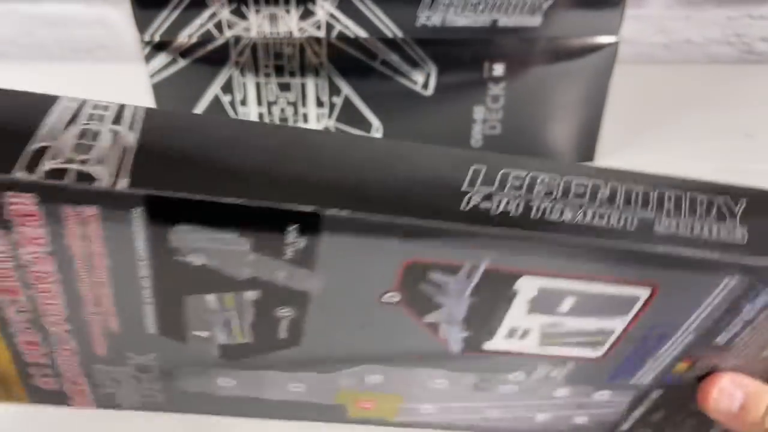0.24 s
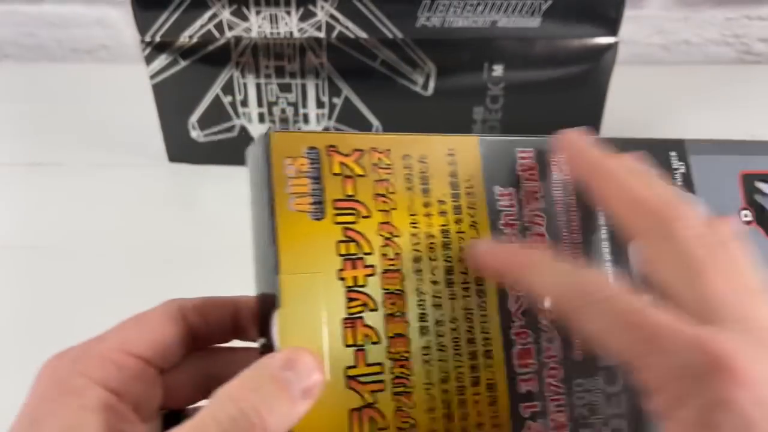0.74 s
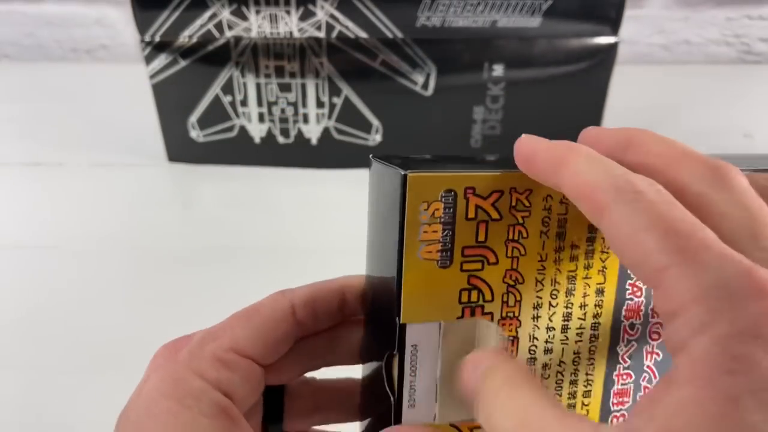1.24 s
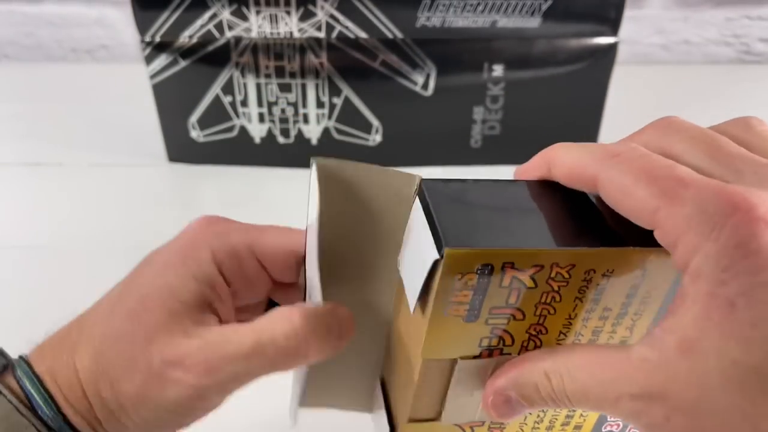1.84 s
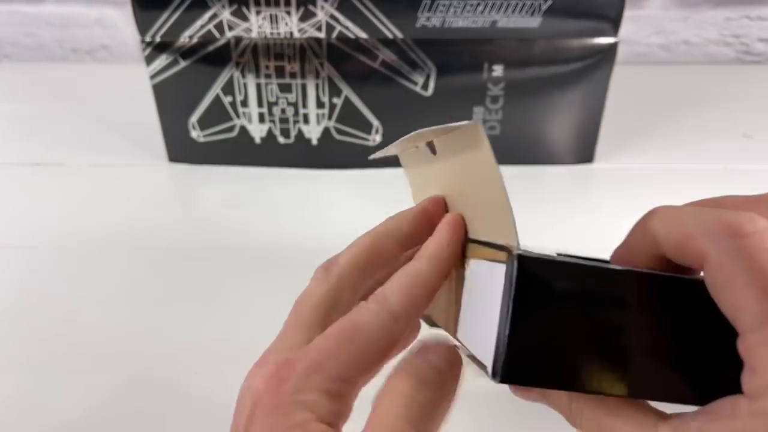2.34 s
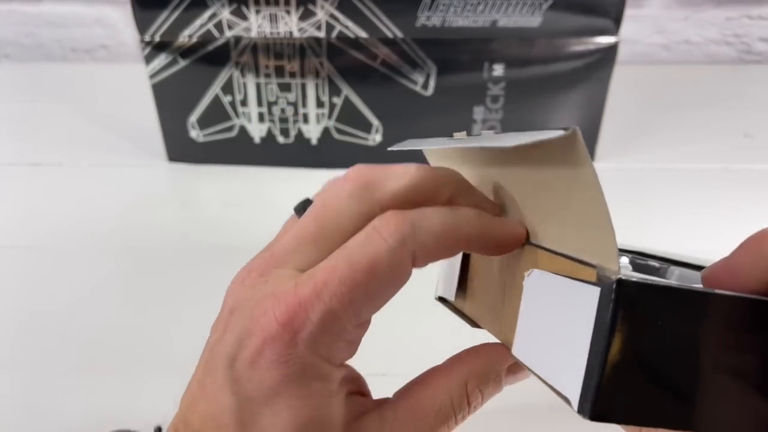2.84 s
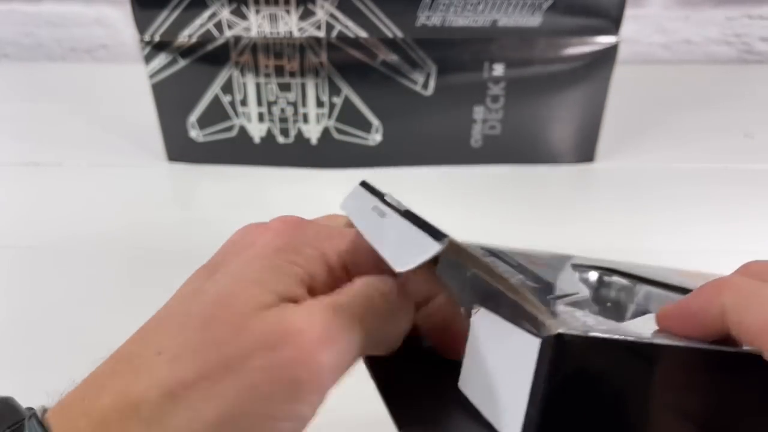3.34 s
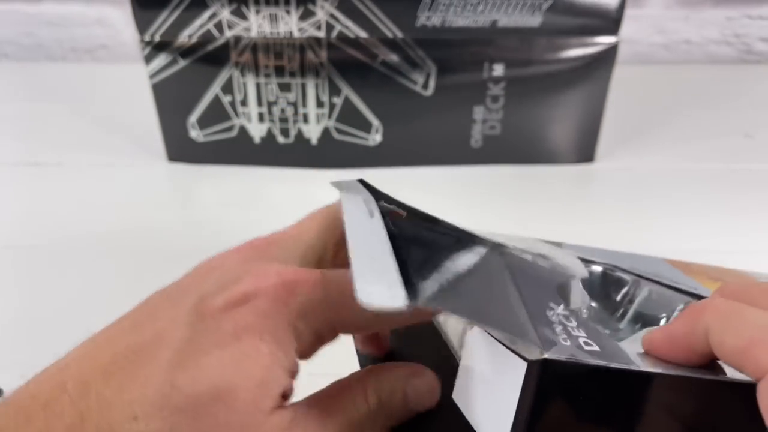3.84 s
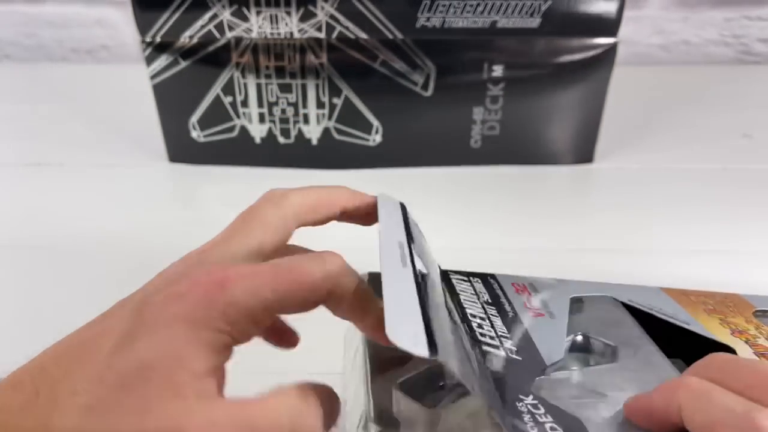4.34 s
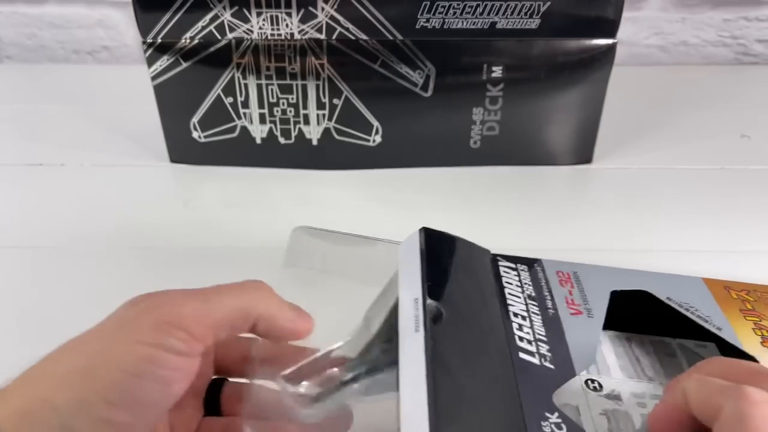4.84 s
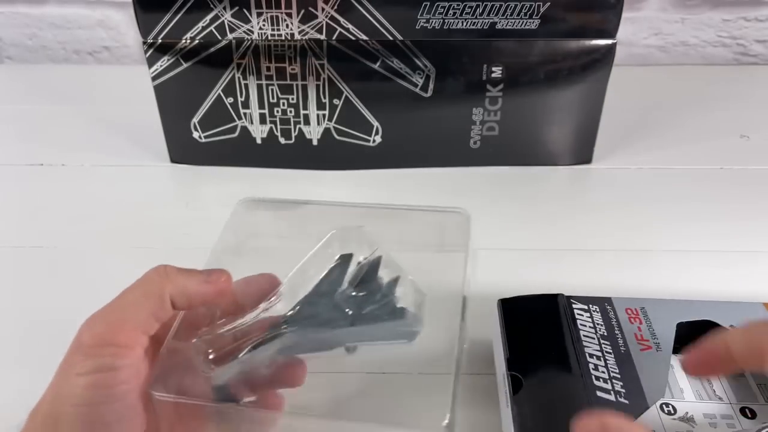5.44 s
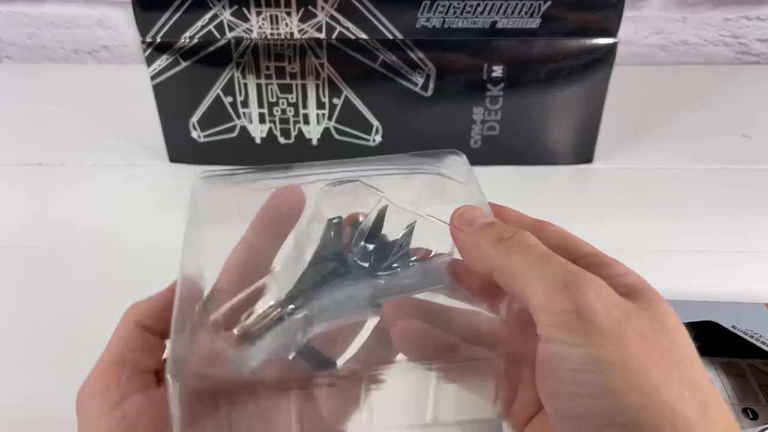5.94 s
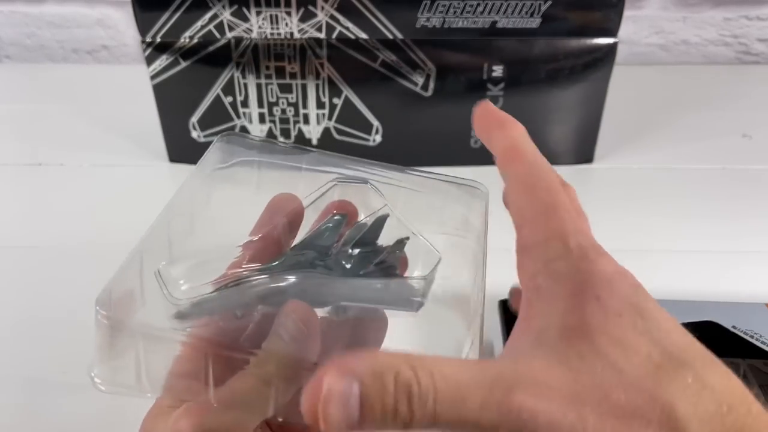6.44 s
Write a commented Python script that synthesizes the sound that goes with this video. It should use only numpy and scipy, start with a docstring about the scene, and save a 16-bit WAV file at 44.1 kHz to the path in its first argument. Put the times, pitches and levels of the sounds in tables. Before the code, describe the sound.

Close up in a small room, fingertips rub and bump a light card box, then pick at its flap in sharp little clicks. After more thumps and card scrapes comes one loud, dry snap with a brief papery rattle. A plastic blister tray drags out of the sleeve in uneven jerks, ticking and squeaking, and later flexes with a muted pop. Quiet room noise and hum lie beneath.

```python
"""A cardboard box is handled on a table in a small room: its card ticks, knocks and rubs as hands pick a flap open.
Blows ring card panels, thump the hollow box and crack in the treble; rubs and scrapes are random slips.
The inner flap snaps loudly and rattles; a plastic blister tray scrapes out along the sleeve, crackles,
squeaks, and pops once as it is turned over: bursts of bending waves and slips through its resonances.
Filtered noise and a few wavering sines make the faint room noise and hum underneath."""
import sys
import numpy as np
from scipy import signal
from scipy.fft import rfft, irfft, next_fast_len
from scipy.io import wavfile
from scipy.ndimage import uniform_filter1d

SR = 44100
rng = np.random.default_rng(int(sys.argv[2]) if len(sys.argv) > 2 else 0)


def transcribe(u):
    """Save the signal u as a 16-bit wav file named by the first command-line argument.

    u: samples, shape (n,) or (channels, n), limited to [-1, 1]; the rate is SR.
    q: integer samples, one column per channel.
    """
    v = np.clip(np.atleast_2d(u).T, -1, 1)
    q = np.round(v * 32767).astype(np.int16)
    wavfile.write(sys.argv[1], SR, q)


N = 295205
TAPS = 2048  # response length, samples


def amp(db):
    """Decibels to gain."""
    return 10 ** (np.asarray(db) / 20)


def evened(x):
    """Scales to rms 1."""
    return x / np.sqrt(np.mean(x ** 2) + 1e-20)


def unit(x):
    """Scales to energy 1."""
    return x / (np.linalg.norm(x) + 1e-12)


def read(points, hz, axis=1):
    """One table column, interpolated linearly over log frequency."""
    points = np.array(points)
    return np.interp(np.log(hz + 1), np.log(points[:, 0] + 1), points[:, axis])


def add(mix, start_s, sound):
    """Mixes a sound in at start_s, cropped to the mix."""
    at = round(start_s * SR)
    sound = sound[max(-at, 0):]
    part = mix[max(at, 0):][:len(sound)]
    part += sound[:len(part)]


def push(t, start_s, hold_s, attack_s, fade_db_per_s):
    """Envelope of a push of the hand: attack, hold, release."""
    attack = np.clip((t - start_s) / attack_s, 0, 1)
    return attack * amp(-fade_db_per_s * np.maximum(t - start_s - attack_s - hold_s, 0))


def drone(hz, width_hz, size=8192):
    """A low resonance kept going by random pushes, rms 1."""
    f = np.fft.rfftfreq(size, N / size / SR)
    resonance = 1 / (1 + (2 * (f - hz) / width_hz) ** 2)
    slow = irfft(rfft(rng.standard_normal(size)) * resonance, 4 * size)
    return np.interp(np.arange(N), np.linspace(0, N, len(slow)), evened(slow))


RING_WIDTH = 0.11  # half width of the main mode, share of its pitch


def ring(spectrum, hz=1000, focus_db=0, ripple_db=0, ring_db=0, octaves=.4, size=7):
    """Causal (minimum-phase) response of a surface: one main mode at hz among randomly excited lesser modes.
    The spectrum falls by about focus_db an octave away from hz; the main mode stands out by ring_db."""
    f = np.fft.rfftfreq(TAPS, 1 / SR)
    noise = rng.standard_normal(len(f))
    modes = evened(uniform_filter1d(uniform_filter1d(noise, size), size))
    main = 1 / (1 + ((f - hz) / (RING_WIDTH * hz)) ** 2)
    db = read(spectrum, f) - focus_db * np.hypot(np.log2((f + 50) / hz), octaves)
    db += ring_db * main + ripple_db * np.tanh(modes) * (1 - main)
    # folding the cepstrum makes the response causal
    cepstrum = irfft(np.log(amp(np.maximum(db, -100))))
    return unit(irfft(np.exp(2 * rfft(cepstrum[:TAPS // 2], TAPS))))


# modes of the hollow box, before detuning: (frequency [Hz], relative level [dB], t60 [s])
BOX_MODES = [(160, -9, 0.046), (239, -2, 0.047), (374, 0, 0.042), (479, -0.5, 0.043)]
THUD_HZ, THUD_OCTAVES = 346, 0.46  # usual pitch of a pushed wall, spread either way
THUD_CYCLES, BOX_RING_DB = 0.59, -5.5  # cycles to envelope peak; ring re wall


def hollow(hz=None, spread=0.098):
    """A box wall gives and springs back in a couple of cycles; low modes, detuned by the grip, ring faintly on."""
    t = np.arange(TAPS) / SR
    spot_hz = THUD_HZ * 2 ** (THUD_OCTAVES * rng.uniform(-0.98, 1))
    turns = (hz or spot_hz) * t
    wall = turns * np.exp(-turns / THUD_CYCLES) * np.sin(2 * np.pi * turns)
    mode_hz, db, t60_s = np.transpose(BOX_MODES)[:, :, None]
    mode_hz = mode_hz * (1 + spread * rng.uniform(-0.93, 1, mode_hz.shape))
    sign = rng.choice([-1, 1], mode_hz.shape)
    modes = np.sum(amp(db - 60 * t / t60_s) * np.sin(2 * np.pi * mode_hz * t) * sign, axis=0)
    return unit(unit(wall) + amp(BOX_RING_DB) * unit(modes))


def buckle(buckle_s, size=12):
    """A sheet flips over: a burst of bending waves, evened across wide bands and cut at 12 ms."""
    u = np.arange(TAPS // 2) / SR / max(buckle_s, 1e-4)
    z = rfft(rng.standard_normal(len(u)) * np.sqrt(u) * np.exp(-(u / 2.54) ** 2))
    z /= np.sqrt(uniform_filter1d(abs(z) ** 2, size) + 1e-12)
    return unit(irfft(z)[:TAPS // 4])


def friction(count, slips_per_s, grain_db, smooth):
    """Tiny slips of uneven size over a smooth hiss, rms 1."""
    slips = (rng.random(count) < slips_per_s / SR) * rng.choice([-1, 1], count)
    slips = slips * amp(grain_db * np.minimum(rng.exponential(1, count), 3))
    return evened(evened(slips) + smooth * rng.standard_normal(count))


# treble radiated by sharp edges: (frequency [Hz], relative density [dB per Hz])
CRACK = [(2500, -25.5), (4400, -5.5), (5600, 1), (7500, -3), (10000, -6.5), (15500, -13.5)]
MEDIUM_DB, MEDIUM_HZ = -40, 2000  # reference blow
CRACK_DB_PER_DB, CRACK_DB_PER_OCTAVE = .15, 10  # harder blows and higher panels crack more
BASE_BUCKLE_S = 0.000999  # panel flip time scale before stretch
PANEL_RIPPLE_DB = 6  # unevenness of the lesser modes


def clicks(rows, material, gain_db, focus_db, crack_db, room_db, stretch, diffuse_share=.45):
    """Each blow rings a panel, thumps the hollow box and cracks in the treble; returns direct sound and room feed.
    The room gathers all directions, so only a share of the panel's peaks and notches is left in its feed."""
    near, far = np.zeros((2, N))
    edge = np.roll(ring(CRACK), 20)
    for start_s, db, hz, thud_db, ring_db, *thud_hz in rows:
        crack = crack_db + CRACK_DB_PER_DB * (db - MEDIUM_DB)
        crack += CRACK_DB_PER_OCTAVE * np.log2(hz / MEDIUM_HZ)
        sheets = []
        for share in (1, diffuse_share):
            panel = ring(material, hz, focus_db, share * PANEL_RIPPLE_DB, share * ring_db)
            sheets.append(amp(db + gain_db) * (panel + amp(crack) * edge))
        direct, diffuse = sheets
        thump = amp(db + gain_db + thud_db) * hollow(*thud_hz)
        add(near, start_s, np.convolve(buckle(BASE_BUCKLE_S * stretch), direct))
        add(near, start_s, thump)
        add(far, start_s + BASE_BUCKLE_S, diffuse + thump)
    return np.array([near, amp(room_db) * far])


THUD_DB_PER_DB = -.5


def thudding(rows, thud_db):
    """Adds each row's hollow thud: thud_db at medium strength, relatively less for harder blows."""
    return [(start_s, db, hz, thud_db + THUD_DB_PER_DB * (db - MEDIUM_DB), ring_db)
            for start_s, db, hz, ring_db in rows]


def catches(spans, above_db, spread_db, hz, octaves, count, ring_db=6):
    """A sliding surface catches at a random moment in each of count slots: rows (time, level, pitch, ring)."""
    rows = []
    for start_s, end_s, db in spans:
        for k, (when, size, spot) in enumerate(rng.random((count, 3))):
            catch_s = start_s + (end_s - start_s) * (k + when) / count
            catch_db = db + above_db + spread_db * (2 * size - 1)
            rows.append((catch_s, catch_db, hz * 2 ** (octaves * (2 * spot - 1)), ring_db))
    return rows


PEAK_SHARE = .45  # position of peak force in a rub or scrape


def drags(rows, material, gain_db, focus_db, room_db, swell, slips_per_s, grain_db):
    """Skin and card edges drag over the box: a swell of slips through panels, hollow box and edges."""
    out, edge = np.zeros(N), ring(CRACK)
    t = np.arange(SR // 3) / SR
    for start_s, length_s, db, hz, thud_db, hiss_db, ring_db in rows:
        force = np.interp(t / length_s, [0, PEAK_SHARE, 1], [0, 1, 0]) ** swell
        panel = ring(material, hz, focus_db, ripple_db=5, ring_db=ring_db)
        body = panel + amp(thud_db) * hollow() + amp(hiss_db) * edge
        drag = friction(len(t), slips_per_s, grain_db, smooth=0.52)
        add(out, start_s, amp(db + gain_db) * signal.fftconvolve(force * drag, body))
    return np.array([out, amp(room_db) * out])


def pop(row, spectrum, gain_db):
    """A whole bent panel springs free at once; returns direct sound and room feed."""
    start_s, db, thud_db, buckle_s, room_db = row
    near, far = np.zeros((2, N))
    sheet = ring(spectrum, ripple_db=2) + amp(thud_db) * hollow()
    add(near, start_s, np.convolve(buckle(buckle_s), sheet))
    add(far, start_s, sheet)
    return amp(db + gain_db) * np.array([near, amp(room_db) * far])


# room noise: (frequency [Hz], relative density [dB per Hz])
AIR = [(15, -12), (35, -4), (60, -0.5), (80, -8), (150, -11.5), (250, -8.5), (350, -14), (700, -21),
       (1400, -27), (2800, -36), (5600, -45), (10000, -50.5), (15800, -51.5)]
AIR_DB = -54  # rms
# hum: (frequency [Hz], peak level of the steady sine [dB])
HUM = [(59.3, -57.5), (118.5, -62.5), (237, -70), (285, -68)]


def background(waver=0.71):
    """Steady shaped room noise, and hum: sines plus narrow-band wavering."""
    t, size = np.arange(N) / SR, next_fast_len(N, True)
    spectrum = amp(read(AIR, np.fft.rfftfreq(size, 1 / SR)))
    air = irfft(rfft(rng.standard_normal(size)) * spectrum, size)[:N]
    hum = np.zeros(N)
    for hz, db in HUM:
        steady = np.sin(2 * np.pi * (hz * t + rng.random()))
        hum += amp(db) * (steady + waver * drone(hz, width_hz=8))
    return amp(AIR_DB) * evened(air) + hum


# hands shift their grip: (start [s], end [s], level [dB], hollow thud re panel [dB])
RUBS = [(-.05, .12, -63, -9), (.22, .5, -69, -5), (.48, 0.618, -57.5, -9), (.54, 0.701, -60.5, 5.5),
        (0.661, .82, -60.5, 6.5), (.8, 1.102, -65.5, 4), (1.37, 1.46, -62, -16), (1.46, 1.659, -55.5, 7),
        (1.93, 1.991, -57.5, 5), (2.851, 3.032, -57, 3), (3.015, 3.118, -52, 10), (3.13, 3.33, -55.5, -3),
        (3.3, 3.48, -54.5, -1.5), (3.44, 3.72, -57, -4), (3.7, 3.96, -56.5, -8), (3.93, 4.05, -55.5, -4),
        (4.085, 4.136, -52, -2)]
# card panel radiation: (frequency [Hz], relative density [dB per Hz])
CARD = [(200, -24.5), (550, 0.5), (800, 4), (1200, -1.5), (1900, -1), (2600, -3.5), (3300, -3.5),
        (4200, -8.5), (5300, -7.5), (8000, -28), (15000, -47)]
SKIN_HZ = 1450  # panel pitch under a fingertip
SKIN_HISS_DB, HISS_DB_PER_THUD_DB = -10.5, -0.52  # a flat, thudding grip hisses less


def rubs():
    """Fingertips drag slowly and softly on card, with faint ticks where the skin catches."""
    rows = []
    for start_s, end_s, db, thud_db in RUBS:
        hiss_db = SKIN_HISS_DB + HISS_DB_PER_THUD_DB * thud_db
        rows.append((start_s, end_s - start_s, db, SKIN_HZ, thud_db, hiss_db, 0))
    spans = [row[:3] for row in RUBS]
    # the second field of a span is its end: here the end [s] from the table
    ticks = catches(spans, above_db=-0.5, spread_db=3, hz=1700, octaves=0.65, count=2)
    skin = drags(rows, CARD, gain_db=0, focus_db=4.5, room_db=-4, swell=1.17, slips_per_s=800, grain_db=3.5)
    return skin + clicks(thudding(ticks, thud_db=-11.5), CARD, gain_db=21, focus_db=5, crack_db=-12,
                         room_db=-5, stretch=1.2)


# box bumped, side flaps pushed open, box drops back as the tray leaves:
# (time [s], level before gain [dB], panel pitch [Hz], hollow thud re panel [dB], thud pitch [Hz])
BOX_KNOCKS = [(.067, -41.5, 1130, 1, 259), (.239, -50, 1330, 11.5, 189), (.5545, -41.5, 1400, 14.5, 201),
              (.573, -45, 900, 6, 251), (.591, -47.5, 1010, 15, 95), (.675, -45.5, 950, 7.5, 286),
              (.769, -48.5, 1400, 11, 288), (.942, -49.5, 1370, 0, 250), (1.463, -46, 1350, 5.5, 231),
              (1.52, -40, 1130, 4.5, 294), (2.7157, -37.5, 1500, 3.5, 301), (2.8495, -43, 1670, 7.5, 293),
              (2.893, -53, 1360, 14, 280), (2.9136, -46, 1600, 7, 288), (2.929, -48, 1180, 5, 300),
              (3.7385, -40.5, 1210, 10.5, 250), (3.746, -35, 900, 0, 262), (3.8426, -37.5, 1310, 4.5, 352),
              (3.8489, -34.5, 960, -2.5, 280), (4.171, -33.5, 1020, -2, 454), (5.2547, -38, 1000, 4.5, 400),
              (5.29, -39, 950, -2, 600), (5.298, -41, 600, 2, 436)]
KNOCK_RING_DB = 4.5
REBOUND_S, REBOUND_DB = (.008, .024), -12.5  # delay (min, max); level re knock


def knocks():
    """Each knock on the box rings and thumps it; it settles back once, softly."""
    rows = [(start_s, db, hz, thud_db, KNOCK_RING_DB, thud_hz)
            for start_s, db, hz, thud_db, thud_hz in BOX_KNOCKS]
    rebounds = [(start_s + rng.uniform(*REBOUND_S), db + REBOUND_DB, *rest) for start_s, db, *rest in rows]
    return clicks(rows + rebounds, CARD, gain_db=23, focus_db=7, crack_db=-11.5, room_db=-5, stretch=1.2)


# card edges and tray rim scrape:
# (time of peak force [s], length [s], level before gain [dB], pitch [Hz], main-mode ring [dB])
SCRAPES = [(.459, 0.048, -46, 1670, 3), (.53, .05, -53, 1700, 6), (.93, 0.048, -55.5, 2200, 3),
           (1.166, .12, -47, 2600, -2), (1.168, .03, -35.5, 1950, 8), (1.183, .022, -33, 2900, 9),
           (1.724, .036, -35, 3500, 9), (1.785, .07, -45, 3100, 5), (2.2, .09, -47.5, 2800, 4),
           (2.314, 0.058, -51.5, 3280, 5), (3.032, 0.057, -33.5, 2350, 8), (3.081, 0.079, -42.5, 2400, 4),
           (3.259, 0.041, -50.5, 2400, 4), (4.171, 0.054, -44, 1810, 3), (4.234, 0.084, -47, 1810, 2),
           (4.375, .16, -45, 1630, 7), (4.488, 0.068, -52.5, 2800, 4), (4.601, 0.051, -47, 2130, 5),
           (5.288, .05, -43.5, 1000, 5), (5.426, .035, -43, 2580, 1), (5.65, 0.041, -45.5, 1710, 2),
           (5.704, .04, -47.5, 1700, 4), (6.296, 0.068, -52.5, 1900, 4.5)]
# small flaps and cut card edges: (frequency [Hz], relative density [dB per Hz])
FLAP_EDGE = [(200, -24), (550, -1.5), (800, -0.5), (1200, -2), (1800, 0), (2600, -2), (3300, -2),
             (4200, -7), (5500, -7), (7200, -18), (9000, -28), (15000, -44)]
THUD_DB_PER_OCTAVE = -7


def scrapes(thud_db=-9, hiss_db=-11):
    """Hard edges drag quickly and brightly, with more hiss and less thud the higher their pitch."""
    rows = []
    for peak_s, length_s, db, hz, ring_db in SCRAPES:
        octaves = np.log2(hz / MEDIUM_HZ)
        thud = thud_db + THUD_DB_PER_OCTAVE * octaves
        hiss = hiss_db + CRACK_DB_PER_OCTAVE * octaves
        rows.append((peak_s - PEAK_SHARE * length_s, length_s, db, hz, thud, hiss, ring_db))
    return drags(rows, FLAP_EDGE, gain_db=0.15, focus_db=6.0, room_db=-6.5, swell=1.32,
                 slips_per_s=1600, grain_db=3.5)


# even stick-slip of the tray's rim:
# (start [s], length [s], peak level before flutter [dB], pitch [Hz], glide [octaves])
SQUEAKS = [(.45, .025, -48, 1150, 0), (4.468, 0.037, -49.5, 2880, .12), (4.597, 0.038, -46, 780, 0),
           (4.681, 0.035, -43, 770, 0.0097), (5.283, 0.047, -43, 1720, 0),
           (5.409, 0.027, -44.5, 3420, 0.11)]


def squeaks(jitter=0.049, flutter_db=3, room_db=-9, size=60):
    """Nearly regular slips lock onto one mode: a short, rough tone that swells and stops."""
    out = np.zeros(N)
    for start_s, length_s, db, hz, glide in SQUEAKS + chirps():
        u = np.arange(TAPS) / SR / length_s
        wobble, grip = (evened(uniform_filter1d(z, size)) for z in rng.standard_normal((2, TAPS)))
        turns = np.cumsum(hz * 2 ** (glide * (u - .5)) * (1 + jitter * wobble)) / SR
        swell = amp(db + flutter_db * grip) * np.sin(np.pi * np.minimum(u, 1))
        add(out, start_s, swell * np.sin(2 * np.pi * turns))
    return np.array([out, amp(room_db) * out])


# box pressed on the table: (start [s], hold [s], sway level [dB], drumming level [dB])
PRESSES = [(0.554, .21, -48.5, -41), (1.468, 0.17, -53, -51), (2.03, 0.086, -66, -52.5),
           (3.74, .03, -62, -47.5), (4.26, .03, -66, -48), (5.278, 0.14, -47, -51)]
PRESS_ATTACK_S, PRESS_FADE_DB_PER_S = 0.009, 88.5


def table():
    """The table sways on its legs under each press; at each swing the box bumps softly and the top drums."""
    t = np.arange(N) / SR
    sway, swings = drone(hz=35, width_hz=9), np.zeros(N)
    swings[signal.find_peaks(sway)[0]] = 1
    bumps = evened(signal.oaconvolve(swings, hollow(hz=102.5))[:N])
    drumming = amp(-2.5) * drone(hz=97, width_hz=13) + amp(-6.5) * drone(hz=61.3, width_hz=10)
    top = evened(bumps + drumming)
    out = np.zeros(N)
    for start_s, hold_s, sway_db, top_db in PRESSES:
        press = push(t, start_s, hold_s, PRESS_ATTACK_S, PRESS_FADE_DB_PER_S)
        out += press * (amp(sway_db) * sway + amp(top_db) * top)
    return out


# fingers and flaps on card:
# (time [s], level before gain [dB], panel pitch [Hz], hollow thud re panel [dB], main-mode ring [dB])
CARD_CLICKS = [(.569, -49, 2800, -3, 0), (.762, -51.5, 3100, -3, 5), (.929, -52.5, 2680, -12, 9),
               (1.1135, -55, 2800, -8, 3), (1.13, -51, 2600, -10, 9), (1.231, -33.5, 2900, -4, 1),
               (1.2645, -32.5, 1670, -10.5, 16), (1.626, -54, 2800, -2, 1), (1.711, -31, 3100, -7, 7),
               (1.7186, -30, 3370, -10, 8), (1.7265, -32.5, 3370, -12, 14), (1.7845, -39, 1600, -2, 5),
               (1.7905, -32.5, 3000, -8, 8), (1.7935, -33, 1690, -1, 4), (1.81, -44, 3000, -6, 0),
               (2.1885, -39.5, 2600, 0.5, 6), (2.2005, -38.5, 890, -0.5, 2), (2.3565, -36, 1200, -6, 5),
               (2.364, -30, 2800, -8, 1), (2.9748, -50, 1600, 2, 5), (3.0262, -28, 2300, -6, 10),
               (3.029, -25, 2400, -12, 11), (3.062, -38, 1400, -2, 8), (3.069, -37, 3400, -7, 8),
               (3.077, -41, 3000, -4, 5), (3.098, -33, 1500, -7, 6), (3.1034, -30, 1800, -10, 7),
               (3.2565, -43.5, 1930, -4, 2), (3.3674, -50, 1400, -6, 5), (3.429, -43.5, 1600, -4, 6),
               (3.69, -47.5, 1600, -5, 9), (3.7545, -42.5, 3320, -2, 1), (3.9965, -48.5, 1290, -5, 5)]


def card_clicks():
    """Fingers and flaps click on the card, ringing small panels and cut edges."""
    return clicks(CARD_CLICKS, FLAP_EDGE, gain_db=23, focus_db=5, crack_db=-16.0, room_db=-6.0, stretch=0.93)


# (time [s], level before gain [dB], hollow thud re panel [dB], buckling time scale [s], room feed [dB])
FLAP_SNAP = (4.2634, -13, -11, .0007, -5.3)
# snapping flap: (frequency [Hz], relative density [dB per Hz])
FLAP_SPECTRUM = [(80, -25), (170, -9), (265, 5), (360, 1.5), (480, 6.5), (600, 0), (730, 0), (900, -5),
                 (1200, -5), (1550, 3.5), (2000, 0), (2700, -12), (5000, -19), (8500, -30), (15500, -38)]


def flap_snap():
    """The bent inner flap lets go at once: a loud burst through its resonances."""
    return pop(FLAP_SNAP, FLAP_SPECTRUM, gain_db=23.3)


# flap against sleeve: (time [s], level before gain [dB], pitch [Hz])
RATTLE = [(4.269, -26.5, 480), (4.2754, -30, 1750), (4.2885, -32, 500), (4.294, -36, 1700),
          (4.3055, -31.5, 1600), (4.319, -32.5, 480)]


def rattle(thud_db=-14, ring_db=7):
    """The freed flap flutters against the sleeve in papery slaps."""
    rows = [(start_s, db, hz, thud_db, ring_db) for start_s, db, hz in RATTLE]
    return clicks(rows, CARD, gain_db=22.5, focus_db=8, crack_db=-19.5, room_db=-6, stretch=2.2)


# tray catches: (time [s], level before gain [dB], wall pitch [Hz], main-mode ring [dB])
TRAY_TICKS = [(4.497, -46.5, 2800, 5), (4.512, -48.5, 2600, 2), (4.5814, -47, 3400, 6),
              (4.6805, -37.5, 3500, 8), (4.684, -40.5, 2200, 5), (4.722, -47, 1300, 7),
              (4.7655, -37, 2310, 0), (4.767, -37.5, 760, 9), (4.833, -34.5, 1640, 6),
              (4.856, -42, 1100, 5), (4.891, -43, 2400, 4), (4.911, -39, 1640, 4), (5.007, -47.5, 2600, 6),
              (5.056, -45, 1420, 4.5), (5.0817, -34, 1000, 4), (5.1478, -35, 1050, 6),
              (5.1975, -31, 2350, 5.5), (5.2155, -37.5, 2100, 3), (5.2745, -41, 2500, 3),
              (5.283, -32, 1690, 8), (5.349, -46, 1700, 5), (5.3945, -36.5, 1300, 7), (5.428, -37, 1000, 8),
              (5.451, -38.5, 980, 10), (5.613, -49, 1597, 4), (5.644, -40, 1700, 6),
              (5.705, -44.5, 1600, 1), (5.7686, -36.5, 1970, 6), (5.773, -39, 1210, 2),
              (6.1405, -54, 3780, 11), (6.145, -51.5, 1000, 5), (6.288, -54, 1900, 4),
              (6.5469, -56.5, 1500, 12)]
# tray wall radiation: (frequency [Hz], relative density [dB per Hz])
PLASTIC = [(300, -20), (550, -2), (750, 3), (1100, 0.5), (2300, -2), (3500, -6), (4400, -9), (5200, -5.5),
           (8000, -27), (15000, -45)]
# pulls drawing the tray out: (start [s], hold [s], relative level [dB])
PULLS = [(4.664, .225, -44), (4.989, 0.0099, -51), (5.193, .08, -48.5), (5.395, 0.037, -52)]
PULL_ATTACK_S, PULL_FADE_DB_PER_S = .02, 230


def tray():
    """The thin tray's walls ring in clear ticks, and in small random crackles during each pull."""
    pulls = [(start_s, start_s + hold_s + 2 * PULL_ATTACK_S, db) for start_s, hold_s, db in PULLS]
    rows = TRAY_TICKS + catches(pulls, above_db=-1, spread_db=2, hz=1800, octaves=.7, count=2)
    return clicks(thudding(rows, thud_db=-8.5), PLASTIC, gain_db=23.5, focus_db=7.5, crack_db=-17,
                  room_db=-5.5, stretch=1.6)


def chirps(length_s=0.013):
    """In the long first pull the rim grabs repeatedly, each time on another mode: rows like SQUEAKS."""
    start_s, hold_s, db = PULLS[0]
    span = (start_s, start_s + hold_s + PULL_ATTACK_S, db)
    grabs = catches([span], above_db=-3.5, spread_db=2, hz=2697, octaves=1.1, count=14)
    return [(grab_s, length_s, level_db, hz, 0) for grab_s, level_db, hz, _ in grabs]


# sliding tray: (frequency [Hz], relative density [dB per Hz])
SLIDE_SPECTRUM = [(200, -26), (550, -8), (740, 1), (950, -0.5), (1250, -6), (1700, -5.5), (2400, -8.5),
                  (3400, -9), (4200, -15), (5100, -9), (7500, -19), (10000, -24), (15500, -37)]


def slide(gain_db=-1, room_db=-5.5, uneven_db=0.8, hiss_db=-16, inside_hz=740, outside_hz=1000, count=9):
    """The tray's rim scrapes unevenly along the sleeve; its ring changes and rises as more of it comes out."""
    out, t = np.zeros(N), PULLS[0][0] + np.arange(SR) / SR
    pulls = [amp(db + gain_db) * push(t, start_s, hold_s, PULL_ATTACK_S, PULL_FADE_DB_PER_S)
             for start_s, hold_s, db in PULLS]
    speed = np.max(pulls, axis=0) * amp(uneven_db * drone(hz=25, width_hz=30)[:len(t)])
    travel = np.cumsum(speed) / np.sum(speed) * (count - 1)
    for spot, hz in enumerate(np.geomspace(inside_hz, outside_hz, count)):
        crossfade = np.sqrt(np.maximum(1 - abs(travel - spot), 0))
        drag = friction(len(t), slips_per_s=700, grain_db=3.8, smooth=.5) * crossfade
        body = ring(SLIDE_SPECTRUM, hz, ripple_db=6, ring_db=3.5) + amp(hiss_db) * ring(CRACK)
        add(out, t[0], signal.fftconvolve(speed * drag, body))
    return np.array([out, amp(room_db) * out])


# (time [s], level before gain [dB], hollow thud re panel [dB], buckling time scale [s], room feed [dB])
TRAY_POP = (5.9443, -27.5, -13.5, 0.05, -4)
# popping tray: (frequency [Hz], relative density [dB per Hz])
POP_SPECTRUM = [(150, -21), (290, -6), (560, -11), (930, 4.5), (1250, -9), (1700, -6.5), (2400, -8),
                (3200, -18.5), (5400, -13.5), (7000, -20), (8500, -18), (15500, -37)]


def tray_pop():
    """A bent tray panel springs over at once: a burst through its resonances."""
    return pop(TRAY_POP, POP_SPECTRUM, gain_db=23)


# room tail: (frequency [Hz], t60 [s], relative level [dB])
ROOM = [(120, 0.37, -2.5), (400, 0.35, 0), (1000, 0.41, 0), (1800, 0.41, -0.5), (3520, 0.4, -1),
        (7000, 0.37, -0.5), (15000, 0.26, -3.5)]


def room(x, early_db=-5, early_s=0.0098):
    """Quick reflections off the table and walls, then a tail whose decay depends on frequency."""
    t = np.arange(SR // 2) / SR
    taps = rng.choice([-1, 1], len(t)) * (rng.random(len(t)) < .15) * (t > .005)
    hz, at_s, z = signal.stft(taps, SR, nperseg=256)
    z = z * amp(read(ROOM, hz, axis=2)[:, None] - 60 * at_s / read(ROOM, hz)[:, None])
    tail = unit(signal.istft(z, SR, nperseg=256)[1][:len(t)])
    sparse = rng.standard_normal(len(t)) * (rng.random(len(t)) < .03) * (t > .003)
    early = unit(sparse * np.exp(-t / early_s))
    return signal.oaconvolve(x, unit(tail + amp(early_db) * early))[:N]


def moving_room(x, pattern_hz=0.9004, count=3):
    """The echo pattern changes steadily as the box is turned about: a cyclic blend of fixed responses."""
    turn = np.pi * pattern_hz * np.arange(N) / SR
    return sum(room(x * np.cos(turn + np.pi * k / count)) for k in range(count)) * np.sqrt(2 / count)


# box held nearer or farther: (time [s], room feed change [dB])
DISTANCE = [(1.1, 1), (1.25, -3.5), (1.7, .5), (2.36, -1), (3.03, 0.5)]


def scene():
    """Mixes all the handling, its echo in the room, the table and the background."""
    near, far = (rubs() + knocks() + scrapes() + squeaks() + card_clicks() + flap_snap()
                 + rattle() + tray() + slide() + tray_pop())
    far = far * amp(np.interp(np.arange(N) / SR, *np.transpose(DISTANCE)))
    return (near + moving_room(far) + table() + background())[None]


EDGE_HZ = 16000


def record(dry):
    """Band limit: linear-phase low-pass at EDGE_HZ."""
    lowpass = signal.firwin(511, EDGE_HZ, window=("kaiser", 9), fs=SR)
    return signal.oaconvolve(dry, lowpass[None], "same")


dry = scene()
out = record(dry)
transcribe(out)
```